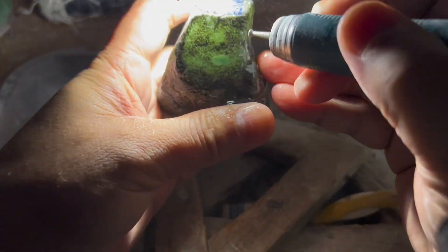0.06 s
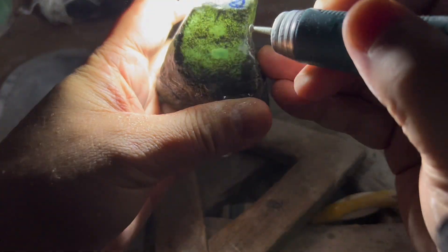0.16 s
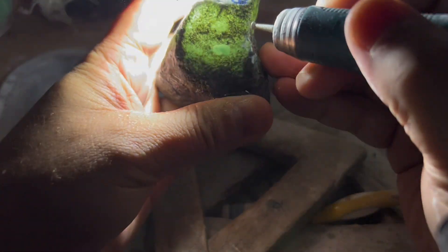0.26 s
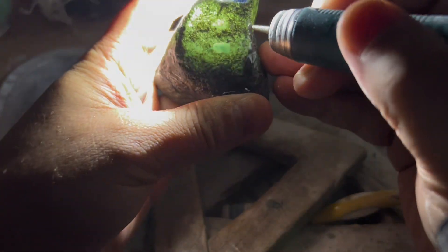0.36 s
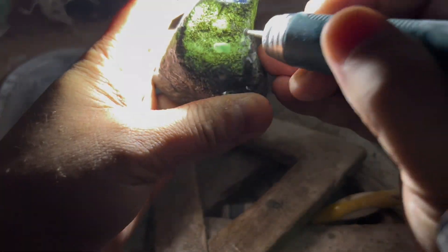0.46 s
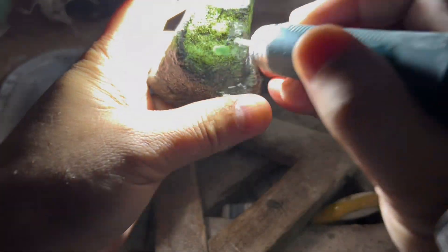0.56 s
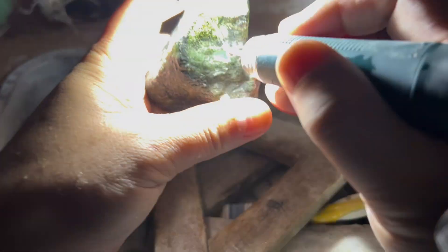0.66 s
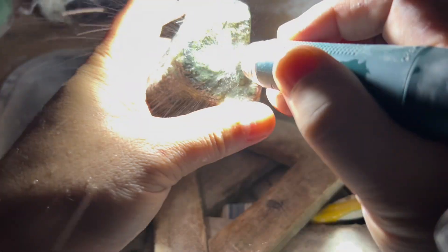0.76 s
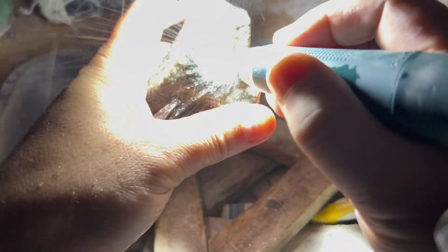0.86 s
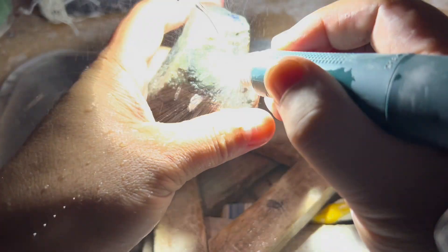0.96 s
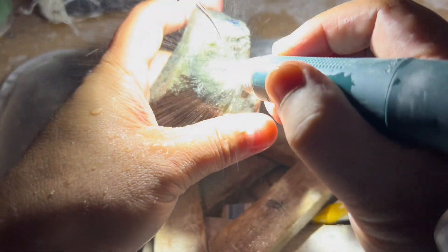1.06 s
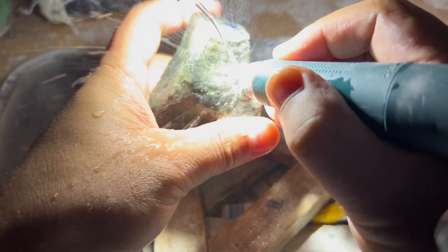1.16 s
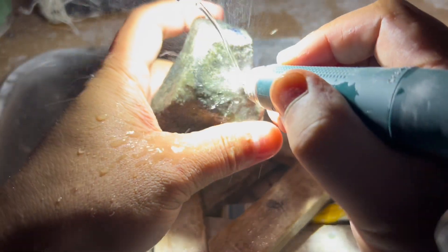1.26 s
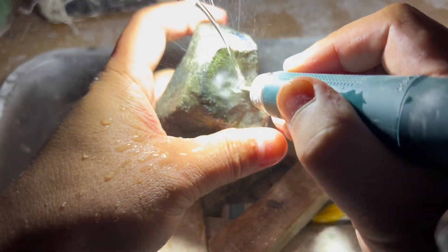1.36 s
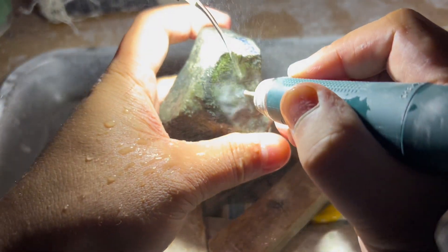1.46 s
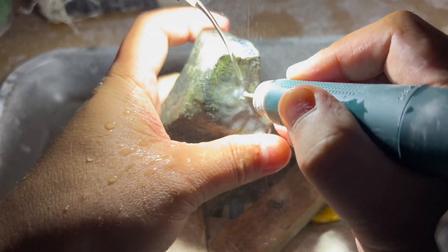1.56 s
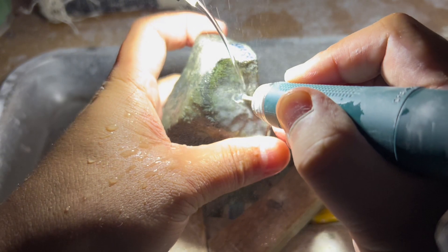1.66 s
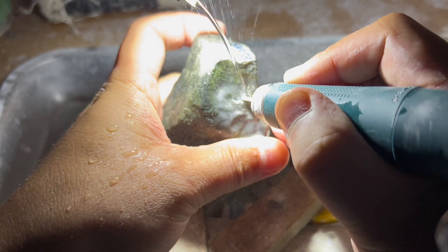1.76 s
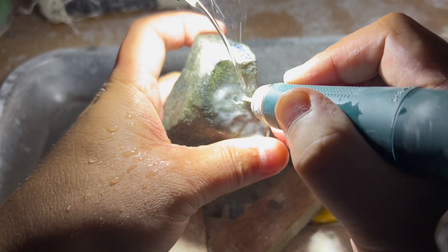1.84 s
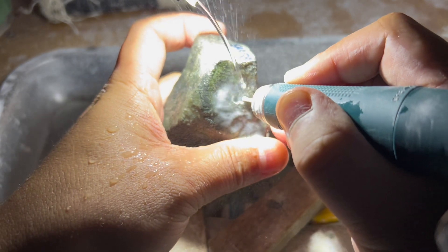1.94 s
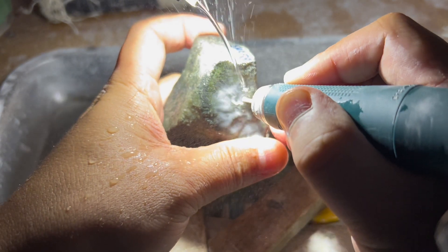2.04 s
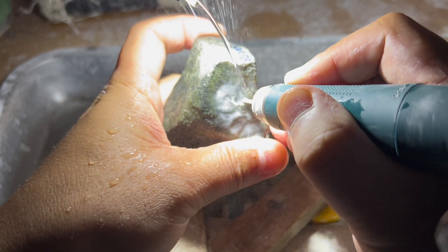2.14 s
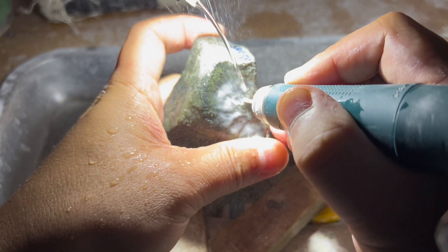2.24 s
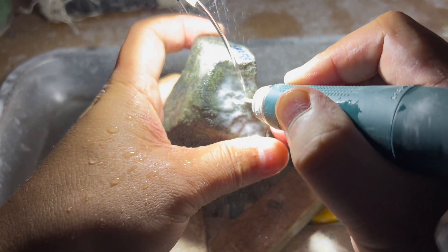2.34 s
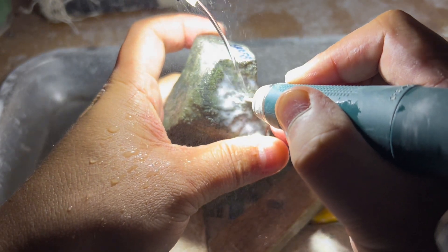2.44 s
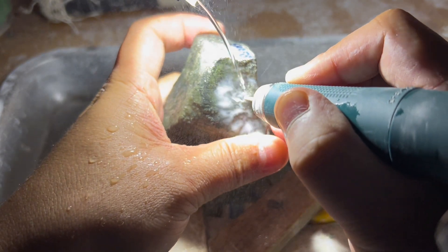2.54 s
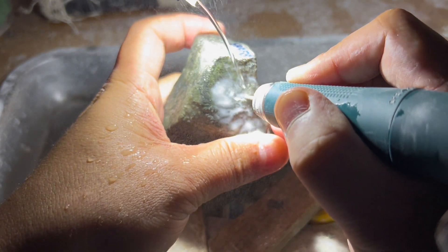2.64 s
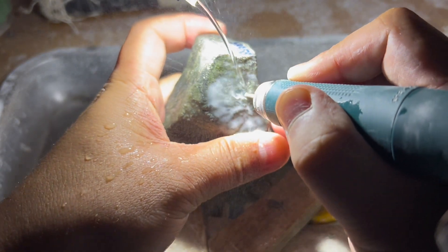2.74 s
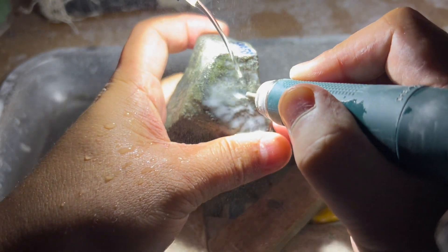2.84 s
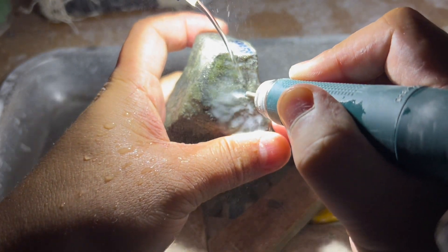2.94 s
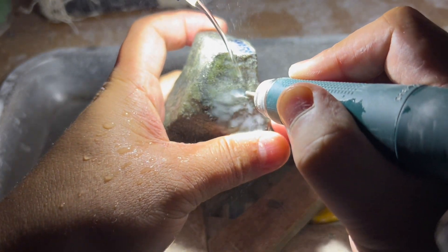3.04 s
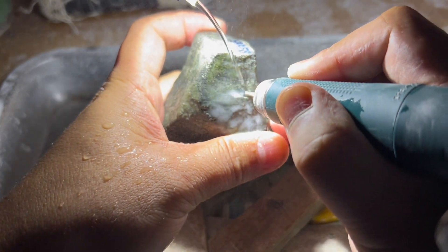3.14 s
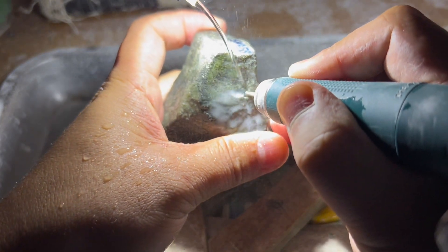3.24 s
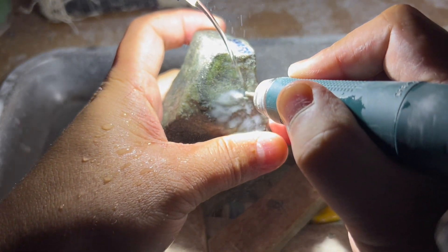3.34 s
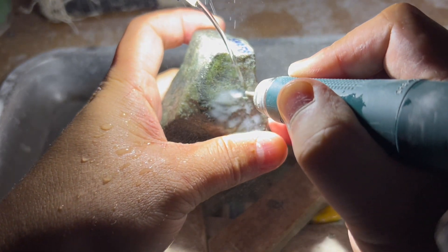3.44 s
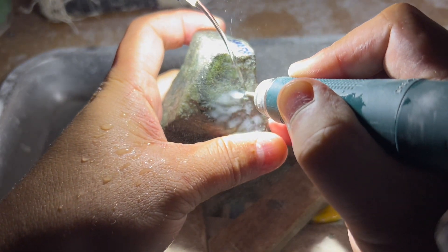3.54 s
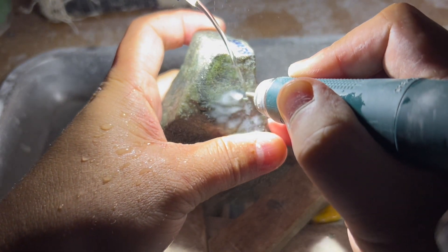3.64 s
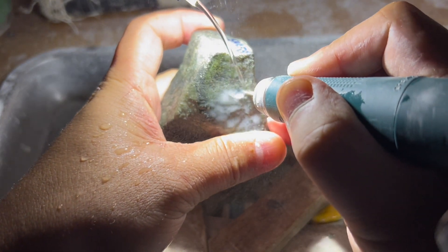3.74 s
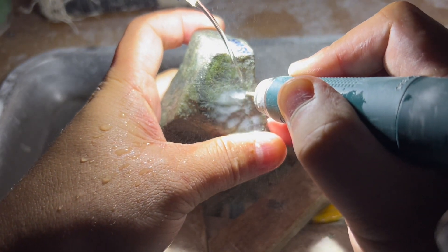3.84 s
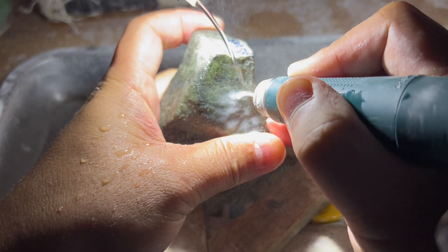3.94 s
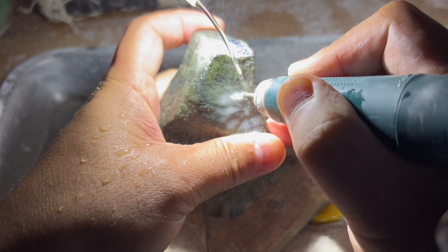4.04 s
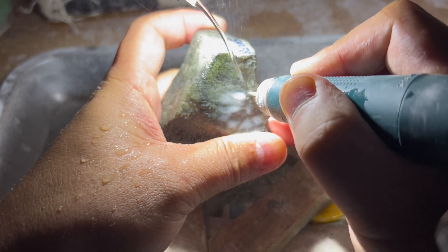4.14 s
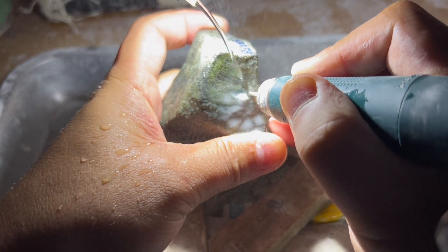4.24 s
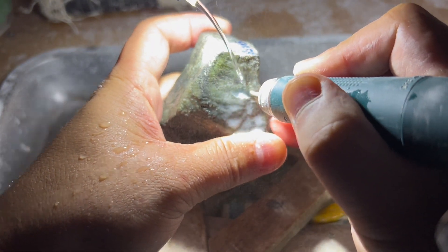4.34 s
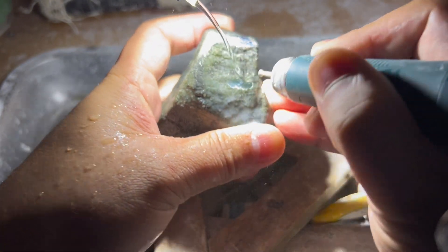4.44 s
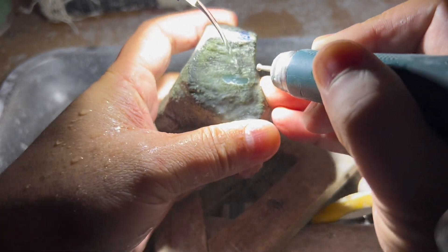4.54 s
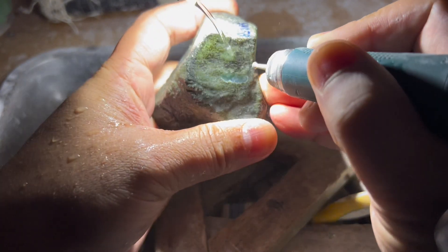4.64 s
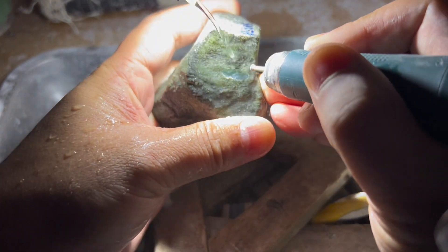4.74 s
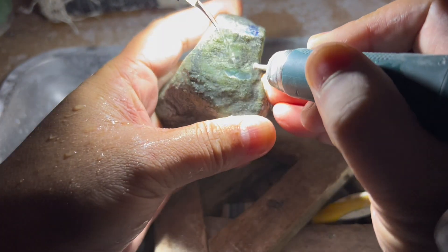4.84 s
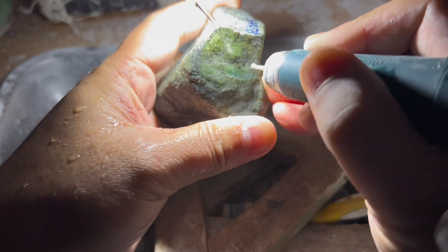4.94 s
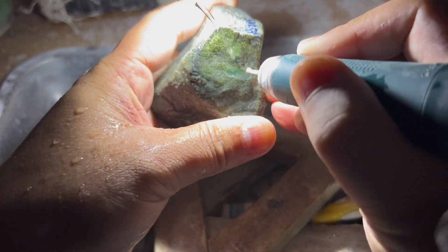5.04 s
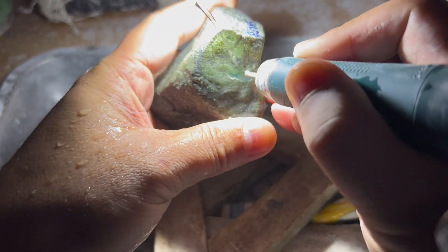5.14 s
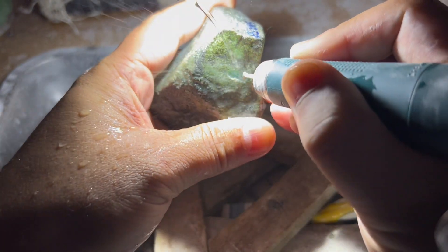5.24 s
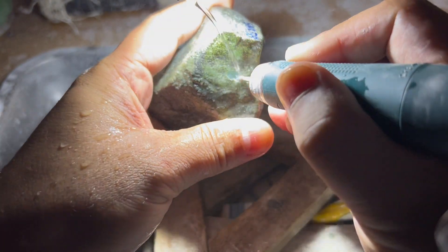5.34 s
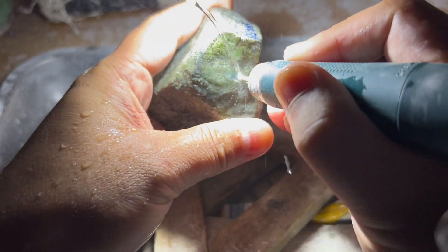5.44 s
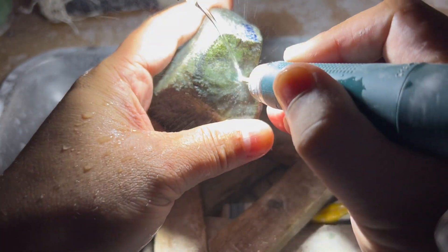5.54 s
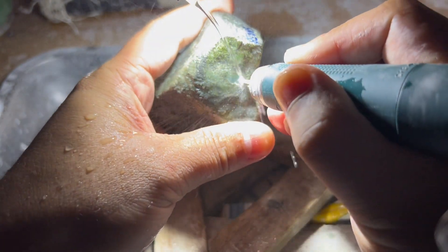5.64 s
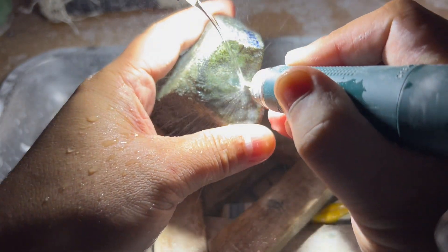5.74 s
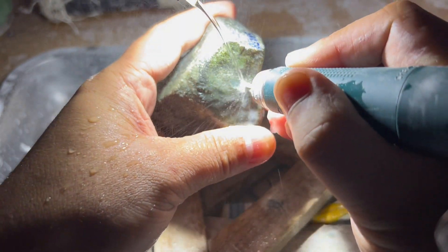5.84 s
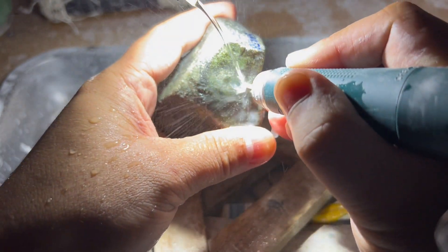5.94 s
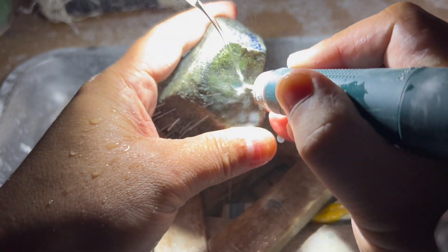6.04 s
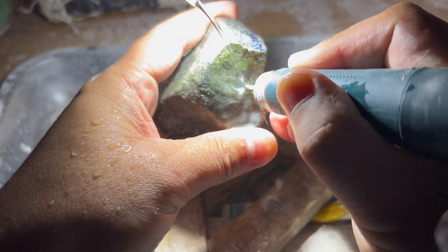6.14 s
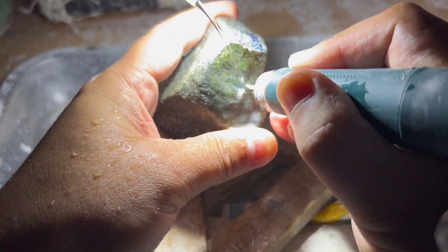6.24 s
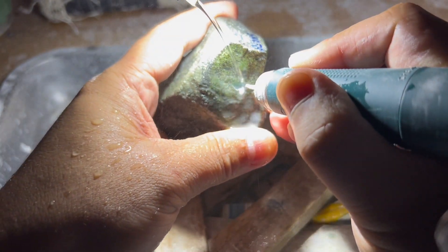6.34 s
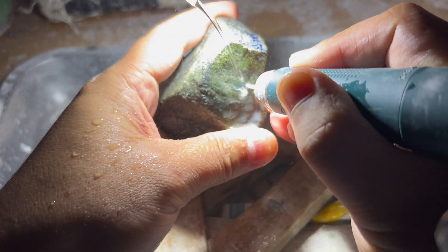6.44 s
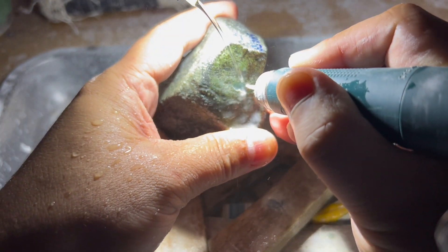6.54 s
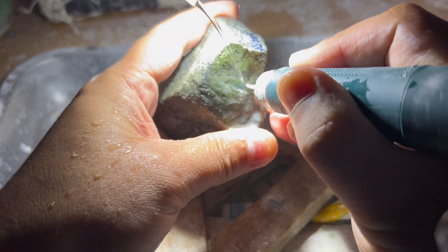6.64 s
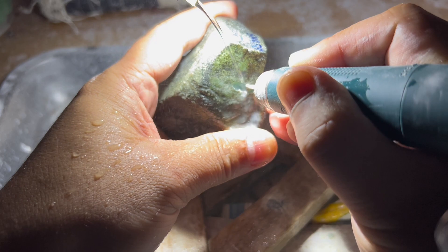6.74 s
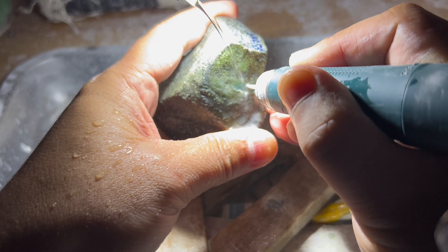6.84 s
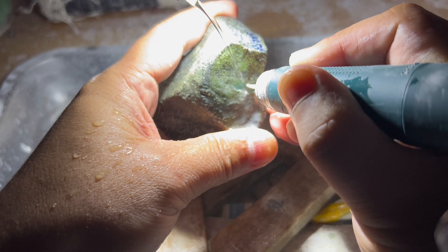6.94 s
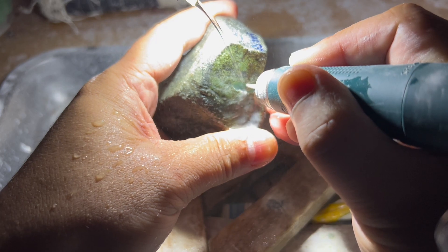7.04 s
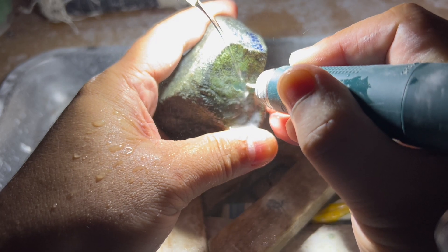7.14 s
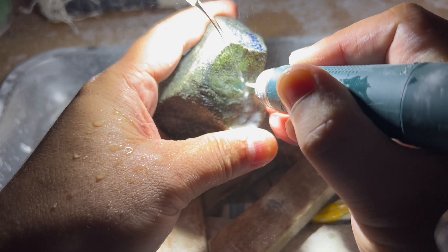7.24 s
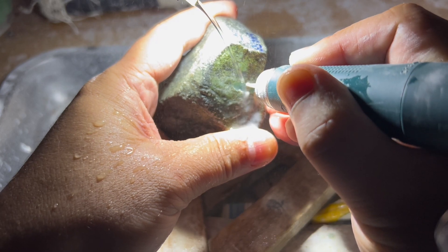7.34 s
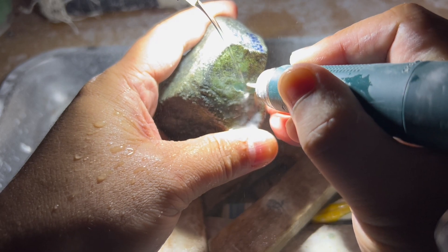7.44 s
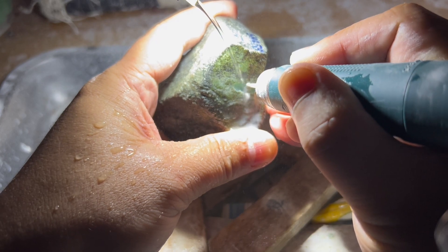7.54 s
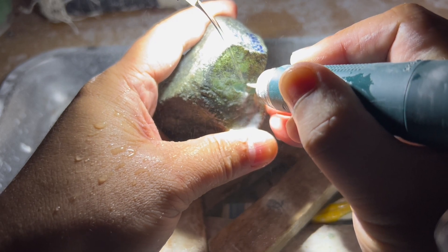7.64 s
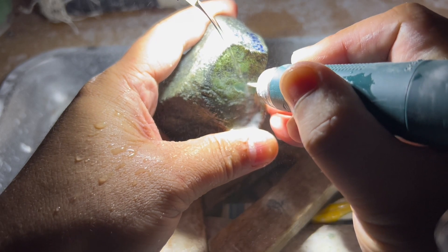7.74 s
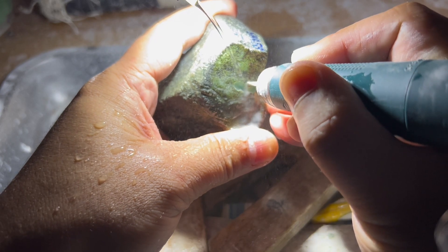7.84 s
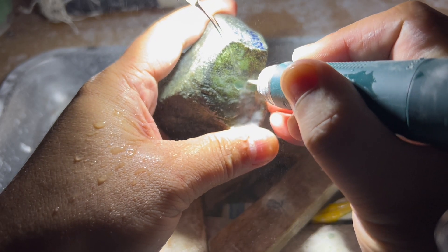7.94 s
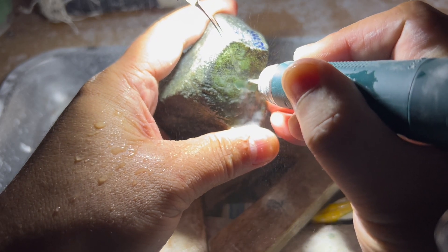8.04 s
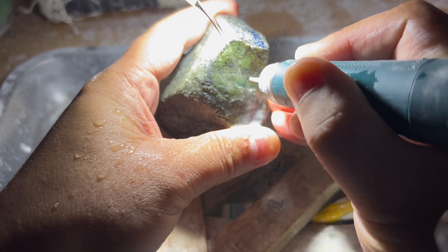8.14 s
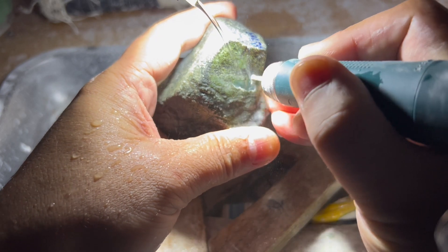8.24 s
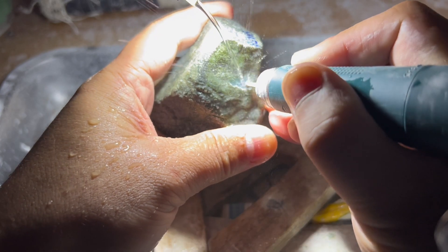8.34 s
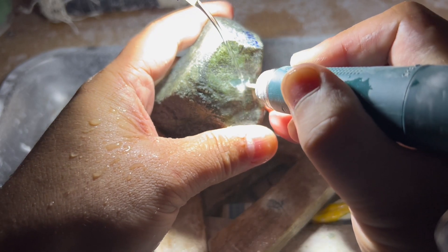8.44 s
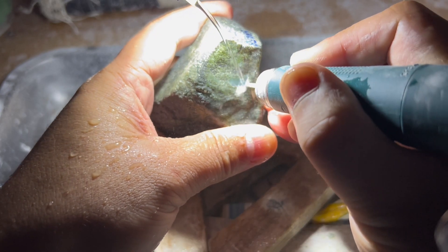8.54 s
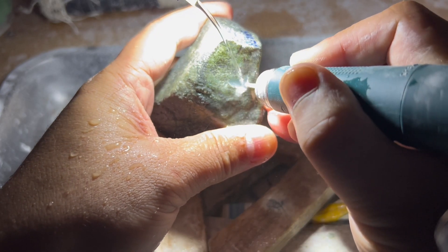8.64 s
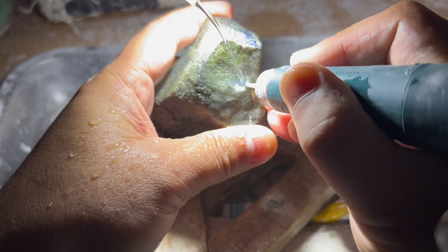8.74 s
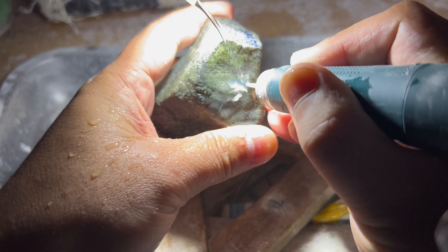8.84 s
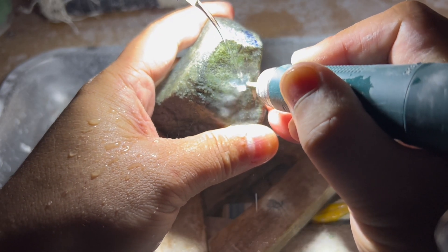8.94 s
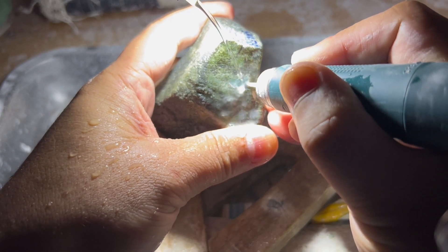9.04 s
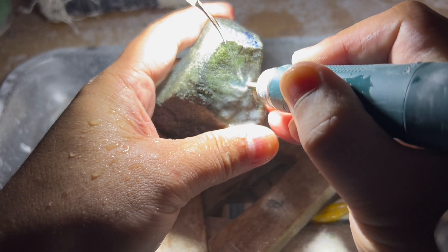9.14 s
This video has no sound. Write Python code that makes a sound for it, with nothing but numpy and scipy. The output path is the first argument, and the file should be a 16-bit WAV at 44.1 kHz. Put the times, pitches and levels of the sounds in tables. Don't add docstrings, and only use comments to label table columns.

```python
import sys
import numpy as np
from scipy import signal
from scipy.fft import rfft, irfft, next_fast_len
from scipy.io import wavfile
from scipy.ndimage import uniform_filter1d

SR = 44100
rng = np.random.default_rng(int(sys.argv[2]) if len(sys.argv) > 2 else 0)


def master_out(mix):
    frames = np.transpose(np.atleast_2d(mix))
    ceiling = np.clip(frames, -1, 1)
    pcm = np.round(ceiling * 32767).astype(np.int16)
    wavfile.write(sys.argv[1], SR, pcm)


def convert_level_to_amplitude(level_db):
    exponent = np.asarray(level_db, float) / 20
    return 10 ** exponent


N = 405279
TIME = np.arange(N) / SR
FREQ = np.arange(N // 2 + 1) * SR / N

# pitch_hz, level_db_per_hz
HISS_COLOUR = [(180, -50), (350, -21), (750, -21), (1150, -1), (1500, -13.5), (2300, -14), (4500, -13),
               (8000, -13), (11500, -11), (14000, -16), (15700, -18)]
HISS_DB, HISS_DRIFT_DB_S = -77, 0.02
# pitch_hz, level_db_per_hz
RUMBLE_COLOUR = [(15, -50), (30, -26), (55, -1), (75, 1), (110, -5.5), (170, -14.5), (300, -47)]
# time_s, level_db
STREET = [(0.0, -62), (0.25, -80), (1.2, -70.5), (2.64, -66), (3.76, -62), (4.5, -80), (4.96, -79),
          (8.06, -72), (8.47, -92), (9.19, -94)]
# time_s, firing_hz, level_db
ENGINE = [(0, 58.9, -82), (.9, 65, -67.5), (2.2, 73.9, -67.5), (3.7, 81.5, -72), (4.2, 86, -107),
          (5, 87.2, -78), (6.2, 92.7, -80), (7.3, 92.1, -75.5), (9.19, 92.7, -95)]
# pitch_hz, level_db_per_hz
RUSTLE_COLOUR = [(60, -41), (130, 0), (250, -6.5), (400, -8), (650, -18.5), (1200, -34), (2000, -37)]
# start_s, length_s, level_db
HANDS = [(-.1, 0.47, -75.5), (1.6, 0.73, -79.5), (2.4, 0.39, -73), (3.5, 0.32, -72), (3.95, 0.36, -71),
         (5.05, 0.39, -72), (6.2, 0.93, -76.5), (7.0, 1.17, -79.5), (9.1, .2, -78)]
STILL_DB = -85.5

SET_HZ = 840
# start_s, extreme_s, settled_s, change_hz
SPEED_UPSETS = [(.9, 1.2, 1.45, -11), (1.45, 1.79, 2.1, -4.5), (1.3, 2.2, 3.7, -2), (3.7, 4.25, 4.4, -2),
                (4.355, 4.455, 4.78, 55), (4.7, 4.81, 4.95, -5), (5.3, 5.8, 5.97, -13),
                (5.94, 6.03, 6.12, 7), (6.1, 6.13, 6.7, -5), (6.2, 7.7, 8.15, -3), (8.14, 8.27, 8.6, 36),
                (8.42, 8.55, 8.68, -22), (8.7, 8.86, 9.02, -14), (9.02, 9.06, 9.1, 5),
                (9.08, 9.19, 9.3, -12)]
# shaft_order, cold_db (before the first cut), warm_db
MOTOR_ORDERS = [(2, 1, -2), (3, -5, -17), (4, -4, -4), (5, -12, -20), (6, -1, -1), (8, -12, -13),
                (9, -7, -22), (10, -12, -20), (12, -6, -10), (14, -4, -5), (15, -21, -21), (18, -7, -10)]
MOTOR_DB = -74
# shaft_order, cold_db, warm_db
BEARING_ORDERS = [(3.18, -96, -94), (3.82, -94, -100), (4.18, -95, -100), (4.294, -84, -87),
                  (4.71, -95, -89), (4.97, -102, -91), (5.18, -100, -97), (5.83, -100, -91),
                  (6.365, -100, -91), (6.72, -100, -101), (7.0, -99, -95), (7.217, -85, -100),
                  (7.55, -96, -93), (7.82, -99, -94), (8.18, -104, -99), (8.37, -102, -93),
                  (8.59, -95, -110), (8.748, -87, -104), (9.549, -84, -91), (10.55, -96, -97),
                  (10.73, -100, -100), (11.54, -92, -96), (12.55, -94, -104), (12.73, -92, -104),
                  (13.33, -84, -89), (13.46, -94, -104), (14.11, -91, -104), (14.85, -104, -99),
                  (17.88, -95, -92), (18.41, -96, -104), (18.6, -88, -91)]
# time_s, level_db
BEAM = [(0, -4), (.5, 1.5), (.87, 9), (4.45, 6), (4.85, 5.5), (5.3, 5), (8.2, 5), (9.19, -7)]
# start_s, length_s, level_db
SIDE_LOADS = [(.5, 0.95, -83), (1.0, 0.7, -59), (1.7, 0.39, -55.5), (2.13, 1.6, -55), (3.7, 0.53, -61),
              (4.24, .18, -58), (4.44, 0.47, -78), (5.3, 0.35, -71), (5.5, 0.47, -55.5), (6.08, 1.8, -69),
              (6.09, 0.22, -63), (7.24, 0.048, -63), (7.9, 0.33, -57.5), (8.26, 0.36, -69),
              (8.6, 0.46, -59), (9.1, .1, -66)]
UNBALANCE_DB = -84.5

# start_s, peak_db, ring_hz, t60_s
TICKS = [(0.878, -28.5, 3780, 0.025), (0.879, -18, 7740, 0.008), (0.878, -39, 2000, 0.06),
         (1.676, -39.5, 474, 0.041), (2.409, -35, 1460, 0.039), (4.354, -40, 3920, 0.023),
         (4.387, -36, 7700, 0.02), (4.406, -36, 8000, 0.02), (5.697, -32, 4240, 0.019),
         (8.323, -38, 7900, 0.015), (8.848, -32, 3804, 0.042)]

# time_s, pressure_db, grit_db (above pressure), lean_db
LANDINGS = [
    [(0.869, -37, -23, 10), (0.874, -38, -21, 7), (0.877, -48, -16, 4), (0.885, -43.5, -17, 4),
     (0.932, -44, -14, 1), (1.003, -41, -13, -2.5), (1.008, -37, -15, -2), (1.075, -33.5, -12, 1.5)],
    [(5.272, -41, -31, 15), (5.278, -48.5, -28, 13), (5.355, -41.5, -41, 11), (5.372, -43, -24, 3),
     (5.428, -34, -26.5, 1.5), (5.465, -39, -19, -0.5), (5.544, -35.5, -16.5, 0.5)],
    [(8.418, -48, -39, 1), (8.441, -49, -29, 1), (8.448, -38.5, -17.5, 2), (8.507, -35.5, -19.5, 4),
     (8.524, -38.5, -13.5, -0.5), (8.606, -38, -15.5, 2.5)],
]
LANDING_S = .006
# time_s, pressure_db, grit_db (above pressure), lean_db (burr tip high, flank low)
CUTS = [
    [(1.1, -39.5, -8, -1), (1.22, -38, -9.5, 2.5), (1.67, -35, -10, -1), (2.03, -39, -2.5, -2),
     (2.5, -45, 3, -5.5), (3.2, -39.5, -5.5, 0.5), (3.6, -42.5, -1.5, -0.5), (4.37, -41.5, -2.5, -0.5),
     (4.404, -38.5, -13, 10)],
    [(5.62, -37.5, -10, -3.5), (5.7, -38, -9, -5), (5.89, -38, -1, -4), (6.3, -39, -3, -3),
     (6.84, -42, -0.5, -2.5), (7.36, -43.5, 1, -1.5), (7.7, -46, 4.5, -5), (8.1, -42, -2, 0),
     (8.228, -35.5, -11.5, 1.5)],
    [(8.63, -40, -11, 3.5), (8.77, -38.5, -9.5, 5), (8.86, -38.5, -5.5, -2), (9.02, -39, -6, 1.5),
     (9.19, -41.5, 0, -3.5)],
]
# after_cut_s, pressure_change_db, grit_db (above pressure), lean_db
LIFT = [
    (0.013, -3.5, -8, 0),
    (0.019, -18, -3, -1),
    (.05, -32.5, 5, -3),
    (.14, -43, 0, 1),
    (.15, -55, 12, 4),
]
# start_s, length_s, level_db
GRAZE = [
    (8.324, 0.0034, -51),
]
LOW_SHARE, HIGH_SHARE, EVEN_DB = 0.19, 1, -10.5
FLICKER_DB, FLICKER_HZ = 1.5, 13

# shaft_order, level_db
STRIKE = [(1, -17), (2, -7), (3, 4.5), (4, -5.5), (5, 0), (6, -3.5), (7, -5.5), (8, 6), (9, 2.5), (10, -3),
          (11, -0.5), (12, -8.5), (13, 1.5), (14, 3), (15, 1.5), (16, -45), (17, -4), (18, 8.5)]
# shaft_order, level_db
TOUCH = [(1, -29), (2, -49), (3, 4.5), (4, -14.5), (5, -2), (6, -13), (7, 1.5), (8, 13.5), (9, 7.5),
         (10, -4), (11, -10), (12, -30), (13, -33), (14, -28), (15, -22), (16, -65), (17, -52), (18, -34)]
# time_s, second_order_db
ROCKING = [(.8, -5), (1.5, -4.5), (1.8, 5.5), (2.7, -1.5), (4.2, 5), (5.5, -2.5), (6.2, 7), (7.2, 2.5),
           (7.9, 10), (8.5, 2), (8.85, 9.5), (9.19, 11.5)]
STEADY_ORDER, STEADY_SHARE = 4, .8
# start_s, length_s, level_db, first_lag_hz, last_lag_hz
CHATTER = [
    (1.08, 0.24, -3, 203.6, 152),
    (1.35, 0.66, -0.5, 60.3, 60.3),
    (2.04, 0.34, -8.5, 187.5, 170.6),
    (3.48, 0.24, -9, 267.3, 280),
    (3.74, 0.34, -4.5, 227.8, 40.4),
    (4.04, 0.21, -2.5, 60.5, 201.5),
    (5.6, 0.633, -11, 131.1, 109.6),
    (6.19, 0.81, -5, 50.33, 69.04),
    (7.05, 1.3, -17, 179, 174),
    (8.7, 0.59, -3, 60.6, 142.4),
]
# start_s, length_s, level_db
SKIPS = [(1.008, 0.027, -83), (1.084, 0.036, -74), (1.95, 0.8, -75), (2.41, 0.05, -57.5),
         (2.513, 0.24, -64), (2.757, 0.074, -65), (2.938, 0.19, -62.5), (3.19, 0.17, -64),
         (3.389, 0.14, -64.5), (3.982, 0.166, -65), (4.305, 0.054, -54), (5.862, 0.093, -60),
         (6.125, 0.076, -63.5), (6.287, 0.039, -59.5), (6.57, 0.12, -71), (6.742, 1.13, -61),
         (7.84, 0.16, -72), (8.15, 0.044, -70), (8.84, 0.16, -69)]
SMOOTH_DB, STEADY_DB = -98, -34
# shaft_order, chatter_db, skip_db
BOUNCE = [(2, 0.5, -14), (3, -1, -6), (4, -12.5, 1), (5, -3, 1), (8, -3.5, -3.5), (10, 0, 2), (14, 2, -4),
          (18, -1, -8)]
# start_s, length_s, shaft_order, level_db
FAVOURS = [(.85, 0.134, 8, -12), (1.01, 0.073, 3, -13), (1.007, 0.14, 5, 4), (0.885, 0.07, 4, -17),
           (0.88, 0.69, 6, -9.5), (1.25, 0.36, 3, -9), (1.1, 0.552, 5, 4.5), (1.1, 0.894, 7, 3.5),
           (1.25, 0.49, 10, 5), (1.2, 0.46, 18, -8), (1.4, 0.45, 9, -2), (1.8, 0.79, 8, -3),
           (2.02, 0.8, 5, -3), (2, 3.6, 4, 4.5), (3.9, 0.35, 3, 0), (3.0, 1.1, 6, -10), (2.28, 0.34, 18, 5),
           (4.5, 0.37, 18, -6), (0.98, 0.031, 3, -18), (4.22, 0.197, 3, -6), (4.372, 0.04, 9, 14),
           (5.26, 0.11, 8, -17), (5.36, 0.19, 2, 8), (5.37, 0.11, 9, -7), (4.5, 0.17, 4, 16),
           (4.5, .2, 10, 7.5), (5.45, 0.254, 6, -6), (5.29, .15, 6, 2), (5.6, .55, 4, -5),
           (5.7, 0.71, 8, -4.5), (4, .85, 18, 2), (.897, 0.11, 5, 7), (7.4, 1.6, 4, 4.5), (5.26, .1, 2, -8),
           (5.8, 0.1, 4, -16), (4.8, 0.15, 2, 3), (8.1, 0.174, 7, 16), (8.2, 0.054, 9, 9),
           (8.41, 0.066, 8, -19), (8.41, 0.1, 7, 8), (8.47, .17, 9, -4), (8.53, 0.108, 7, -5),
           (8.45, 0.27, 10, -3), (12, .08, 4, -14), (13, 0.035, 5, -15), (8.78, .45, 6, 5),
           (3.8, .4, 14, -4), (8.65, 0.4, 18, -3)]
# start_s, length_s, shaft_order, level_db
MORE_FAVOURS = [(3.401, 0.76, 17, 10), (3.502, 0.66, 14, 6), (4, 0.066, 11, 9), (4.337, 0.092, 13, -1),
                (4.9, 0.24, 13, 5), (5.448, .25, 11, 3.5), (5.55, .5, 17, -10), (3.6, 0.26, 18, -9),
                (6, 0.86, 13, -6), (7.8, .42, 12, 13), (1.2, 0.56, 14, -3), (8.458, .018, 5, -12),
                (5.26, .06, 5, -3), (8.45, 0.36, 11, -8), (8.55, 0.24, 13, -10), (8.799, 0.47, 12, 13),
                (5.37, 0.18, 4, 3), (7.8, .42, 10, -16), (8.101, 0.11, 7, -11), (3.4, .1, 8, -12),
                (4.28, .15, 7, 5), (5.4, .2, 6, -10), (5.3, 0.59, 18, -9), (1.6, 0.335, 3, -4.5),
                (5.26, 0.071, 10, -8), (5.452, .05, 9, 3), (5.6, .1, 7, -4), (2.4, .3, 9, -16)]
# start_s, length_s, shaft_order, level_db
SKIP_FAVOURS = [(2.402, 0.37, 3, 5), (2.5, 0.17, 4, 2), (2.5, 1.0, 5, 4), (3.198, .32, 4, 15),
                (4.282, 0.096, 3, -6), (4.281, .1, 4, -10), (5.8, .6, 3, -7), (6.699, 1.49, 5, -18),
                (6.699, 1.6, 3, -2), (6.7, 1.01, 2, 10), (1.0, .14, 3, 18), (8.8, 0.16, 5, 16)]
FAVOUR_EDGE_S = 0.0098

# pitch_hz, level_db_per_hz
GRIT_COLOUR = [(260, -66), (500, -57), (760, -24.5), (1050, -19.5), (1300, -21.5), (1550, -12.5),
               (1800, -16), (2350, -9), (3060, -14.5), (5400, -14), (6830, -7), (9600, -13), (14000, -12.5),
               (15300, -6)]
# start_s, length_s, level_db
SCRAPES = [(1.007, 0.028, -43.5), (1.084, 0.029, -52), (2.05, 0.27, -50), (2.93, 0.023, -46),
           (3.14, 0.07, -50), (4.32, 0.016, -54), (4.375, 0.031, -49), (5.31, 0.016, -66),
           (5.495, 0.015, -55), (5.685, 0.034, -40), (5.74, 0.018, -41), (8.1, .03, -56),
           (8.16, 0.018, -39.5), (8.63, 0.035, -46), (8.845, 0.029, -41.5), (8.96, 0.035, -45)]
STONE_HZ, STONE_WIDTH_HZ = 3954, 250
# time_s, level_db
STONE = [(.9, -8), (1.05, 10), (1.6, 7), (2.1, 2), (3.4, 2), (3.8, 2), (4.3, -17), (5.4, -17), (5.7, 11),
         (6.1, -6), (7.2, 9), (8.45, -26), (8.6, 16.5), (9.19, -3)]
# start_s, length_s, beat_hz, depth_db
JUDDERS = [
    (2.816, 0.214, 27, 2),
    (3.057, .17, 24.9, 1.5),
    (4.382, .03, 102, 3),
]

# pitch_hz, half_width_hz, level_db
DEAF_BANDS = [(9570, 125, -55), (9500, 420, -10), (13510, 230, -55), (13300, 300, -22)]
TOP_HZ = 15800


def unit(x):
    return x / np.sqrt(np.mean(np.abs(x) ** 2))


def columns(table):
    s, *rest = np.transpose(table)
    return [np.interp(TIME, s, c) for c in rest]


def window(start_s, length_s, edge_s):
    return np.clip(np.minimum(TIME - start_s, start_s + length_s - TIME) / edge_s + .5, 0, 1)


def spans(rows, rest_db, edge_s):
    power = convert_level_to_amplitude(rest_db) ** 2
    for s, length, db, *_ in rows:
        power = power + (convert_level_to_amplitude(db) * window(s, length, edge_s)) ** 2
    return 10 * np.log10(power)


def walk(rate):
    steps = int(N * rate / SR) + 3
    fine = np.repeat(rng.standard_normal(2000)[:steps], 8)
    fine = uniform_filter1d(uniform_filter1d(fine, 8), 8)
    return 1.3 * np.interp(TIME * rate * 8, np.arange(len(fine)), fine)


def wobble(rate):
    return (walk(rate) + 1j * walk(rate)) / np.sqrt(2)


def coloured(spectrum):
    hz, db = np.transpose(spectrum)
    gain = convert_level_to_amplitude(np.interp(np.log(FREQ + 1), np.log(hz), db))
    return unit(irfft(rfft(rng.standard_normal(N)) * gain, N))


def patchy(x, patchy_db, bins=5, frames=4):
    spectra = signal.stft(x, nperseg=512)[2]
    field = uniform_filter1d(rng.standard_normal(spectra.shape), bins, axis=0)
    field = uniform_filter1d(field, frames, axis=1)
    return unit(signal.istft(spectra * convert_level_to_amplitude(patchy_db * unit(field)), nperseg=512)[1][:N])


def brighten(x, window_s=0.066):
    size = int(window_s * SR)
    power = uniform_filter1d(uniform_filter1d(x ** 2, size), size)
    return x / np.sqrt(power + 1e-18)


def far_engine():
    hz, db = columns(ENGINE)
    firing = 2 * np.pi * np.cumsum(hz * (1 + 0.00916 * walk(6))) / SR
    harmonics_db = [.1, -3, -13]
    return sum(convert_level_to_amplitude(db + d + 3.0 * walk(36)) * np.sin(k * firing) for k, d in enumerate(harmonics_db, 1))


def workshop():
    rumble_db, = columns(STREET)
    rustle_db = spans(HANDS, STILL_DB, edge_s=0.3)
    engine = far_engine()
    hiss_db = HISS_DB + HISS_DRIFT_DB_S * TIME + .8 * walk(4)
    hiss = convert_level_to_amplitude(hiss_db) * patchy(coloured(HISS_COLOUR), patchy_db=2.5)
    rumble = convert_level_to_amplitude(rumble_db - 1.5 + 0.21 * walk(12.0)) * coloured(RUMBLE_COLOUR)
    rustle = convert_level_to_amplitude(rustle_db + 6.0 + 2.23 * walk(20)) * coloured(RUSTLE_COLOUR)
    return hiss + rumble + rustle + engine


def motor(hz, angle):
    unbalance_db = spans(SIDE_LOADS, UNBALANCE_DB, edge_s=0.065) + 0.5 * walk(11)
    racing = np.clip((hz - SET_HZ - 5) / 20, 0, .7)
    warm = np.clip(TIME - 2, 0, 1) * (1 - racing)
    beam_db, = columns(BEAM)
    tones, balls = np.zeros(N), np.zeros(N)
    for order, cold_db, warm_db in MOTOR_ORDERS:
        db = cold_db + warm * (warm_db - cold_db) + (order == 6) * beam_db + 1.3 * walk(4)
        tones += convert_level_to_amplitude(db) * np.sin(order * angle + .5 * walk(3))
    for order, cold_db, warm_db in BEARING_ORDERS:
        db = cold_db + warm * (warm_db - cold_db) + 2 * walk(6)
        balls += convert_level_to_amplitude(db) * np.sin(order * angle + walk(6))
    unbalance = convert_level_to_amplitude(unbalance_db - 2.5 + 1.1 * walk(14)) * np.sin(angle)
    return convert_level_to_amplitude(MOTOR_DB) * tones + convert_level_to_amplitude(1.5) * balls + unbalance


def ticks():
    out, t = np.zeros(N), TIME[:4000]
    for s, db, hz, t60 in TICKS:
        fade = np.exp(-np.log(1000) * t / t60) * (1 - np.exp(-t / 0.00051))
        band = signal.butter(2, [hz / 1.8, hz * 1.14], "band", fs=SR)
        crack = signal.lfilter(*band, rng.standard_normal(len(t)))
        ring = .5 * np.sin(2 * np.pi * hz * t)
        start = int(s * SR)
        out[start:start + len(t)] += convert_level_to_amplitude(db - 3.5) * fade * (crack + ring)
    return out


def hand():
    rows = []
    for landing, work in zip(LANDINGS, CUTS):
        start_s, start_db, *start_mix = landing[0]
        end_s, end_db = work[-1][:2]
        rows.append((start_s - LANDING_S - .001, -110, -20, 0))
        rows.append((start_s - LANDING_S, start_db - 12, *start_mix))
        rows += [*landing, *work]
        rows += [(end_s + s, end_db + db, grit_db, lean_db) for s, db, grit_db, lean_db in LIFT]
    press_db, grit_db, lean_db = columns(rows)
    flicker_db = FLICKER_DB * walk(FLICKER_HZ) * np.clip(convert_level_to_amplitude(grit_db), 0, 1)
    low_db, high_db = (share * (grit_db - EVEN_DB) - flicker_db for share in (LOW_SHARE, HIGH_SHARE))
    scrape_db = spans(SCRAPES, -130, edge_s=0.0014)
    grit_db = 10 * np.log10(convert_level_to_amplitude(press_db + grit_db) ** 2 + convert_level_to_amplitude(scrape_db) ** 2)
    press_db = np.maximum(press_db, spans(GRAZE, -130, edge_s=0.0032))
    return press_db + flicker_db, low_db - 2.5 - lean_db, high_db - 4.0 + lean_db, grit_db


def favour(order, rows):
    return sum(db * window(s, length, FAVOUR_EDGE_S) for s, length, k, db in rows if round(k) == order)


def judder():
    beats_db = np.zeros(N)
    for s, length, hz, db in JUDDERS:
        shaking = (TIME > s) * (TIME < s + length)
        beats_db -= db * np.cos(2 * np.pi * hz * (TIME - s)) * shaking
    return beats_db


def shaft_orders(angle, bite, light, fits_db, skip_over_db):
    lag_rows = []
    for s, length, _, first_hz, last_hz in CHATTER:
        lag_rows += [(s, first_hz), (s + length, last_hz)]
    lag_hz, = columns(lag_rows)
    chatter_db = spans(CHATTER, STEADY_DB, edge_s=0.16)
    rough = np.clip(bite * convert_level_to_amplitude(fits_db), 0, .95)
    rocking_db, = columns(ROCKING)
    lag_angle = 2 * np.pi * np.cumsum(lag_hz * (1 + .13 * walk(50))) / SR
    lag = bite * convert_level_to_amplitude(chatter_db + 6) * np.exp(-1j * lag_angle)
    skip = (1 - light) * convert_level_to_amplitude(np.minimum(skip_over_db + 10.5, -1))
    half = skip * np.exp(-.5j * angle)
    quarter = convert_level_to_amplitude(-4) * skip * np.cos(angle / 2) * np.exp(-1j * angle / 4)
    turn = np.exp(1j * angle)
    whine, spin = np.zeros((3, N)), 1
    orders, *bounce_db = np.transpose(BOUNCE)
    for (order, strike_db), (_, touch_db) in zip(STRIKE, TOUCH):
        spin = spin * turn
        loose = STEADY_SHARE if order == STEADY_ORDER else 1
        drift_db = loose * (2.2 * walk(11) - 6 * np.sqrt(bite) * np.abs(walk(45)))
        drift = convert_level_to_amplitude(drift_db) * np.exp(1j * walk(4) + 6j * rng.random())
        blur = loose * rough * min(1, order / 7) ** 0.96
        shape = (1 - blur) * drift + blur * wobble(min(60 + 14 * order, 135))
        chatter, skips = (convert_level_to_amplitude(np.interp(order, orders, b)) for b in bounce_db)
        shape = shape + chatter * lag * wobble(30 + 10 * order)
        shape = shape + skips * convert_level_to_amplitude(favour(order, SKIP_FAVOURS)) * (half + quarter) * wobble(70)
        db = strike_db + light * (touch_db - strike_db) + (order == 2) * rocking_db
        db = db + favour(order, FAVOURS + MORE_FAVOURS)
        if order > 1:
            whine[np.searchsorted([5.5, 11.5], order)] += convert_level_to_amplitude(db) * (shape * spin).real
    return [brighten(w) for w in whine]


def stone_grit(angle, fits_db):
    gate = 1 + 0.37 * np.cos(angle + 3 * walk(22))
    grit = patchy(coloured(GRIT_COLOUR), patchy_db=2.2) * gate * convert_level_to_amplitude(.2 * fits_db + 1.7 * walk(110))
    resonance = signal.iirpeak(STONE_HZ, STONE_HZ / STONE_WIDTH_HZ, fs=SR)
    return grit + convert_level_to_amplitude(*columns(STONE)) * signal.lfilter(*resonance, grit)


def cut(angle):
    press_db, low_db, high_db, grit_db = hand()
    skip_db = np.minimum(spans(SKIPS, SMOOTH_DB, edge_s=0.003) + 2.3 * walk(14), press_db)
    bite = np.clip(convert_level_to_amplitude(grit_db - press_db - 2.0), 0, .85)
    light = np.clip(1 - 5 * bite, 0, 1)
    fits_db = 4.5 * walk(40)
    low, middle, high = shaft_orders(angle, bite, light, fits_db, skip_db - press_db)
    grit = convert_level_to_amplitude(grit_db + 3.5) * stone_grit(angle, fits_db)
    shake = walk(28)
    whine = middle + convert_level_to_amplitude(low_db - 2.0) * low + convert_level_to_amplitude(high_db - 0.5 + 1.14 * shake) * high
    tones = convert_level_to_amplitude(press_db - 3.0) * whine
    knock = wobble(80) * np.exp(.5j * angle) + convert_level_to_amplitude(-2.0) * wobble(90) * np.exp(5j * angle / 4)
    thud = (1 - light) * convert_level_to_amplitude(skip_db - 2.0) * knock.real
    return convert_level_to_amplitude(0.43 * shake + judder()) * (tones + grit) + thud


def scene():
    hz = SET_HZ + sum(np.interp(TIME, row[:3], [0, row[3], 0]) for row in SPEED_UPSETS)
    angle = 2 * np.pi * np.cumsum(hz * (1 + .0007 * walk(20))) / SR
    mono = workshop() + motor(hz, angle) + ticks() + cut(angle)
    return np.array([mono, mono])


def low_pass(x):
    return signal.sosfilt(signal.butter(12, 16740, fs=SR, output="sos"), x)


def record(dry):
    size = next_fast_len(N + 8192)
    hz = np.arange(size // 2 + 1) * SR / size
    db = sum(d * np.exp(-((hz - centre) / width) ** 4) for centre, width, d in DEAF_BANDS)
    db = db - 80 / (1 + np.exp(np.clip((TOP_HZ - hz) / 30, -50, 50)))
    mix = irfft(rfft(dry, size) * convert_level_to_amplitude(db), size)[:, :N]
    return low_pass(mix)


dry = scene()
out = record(dry)
master_out(out)
```